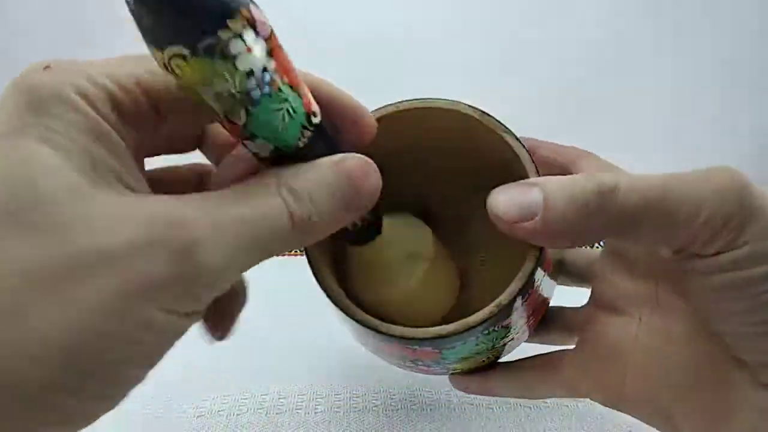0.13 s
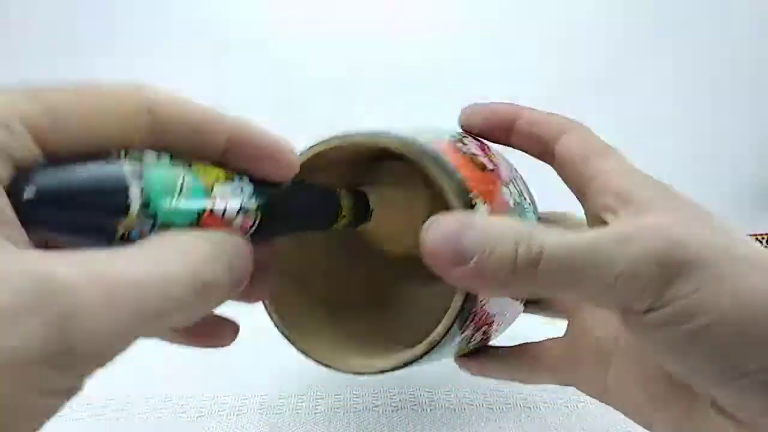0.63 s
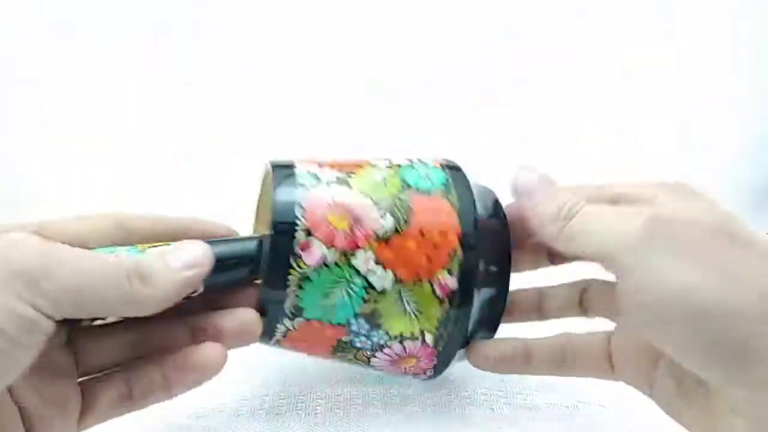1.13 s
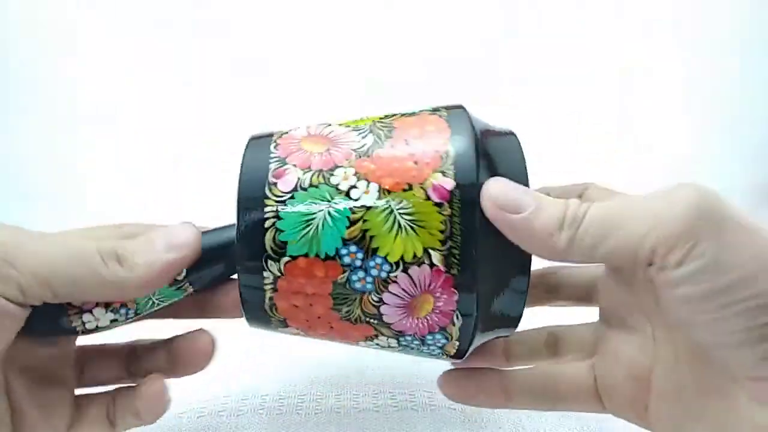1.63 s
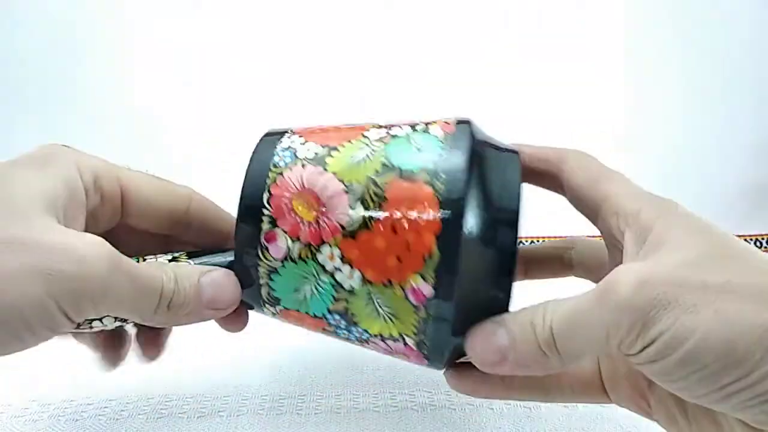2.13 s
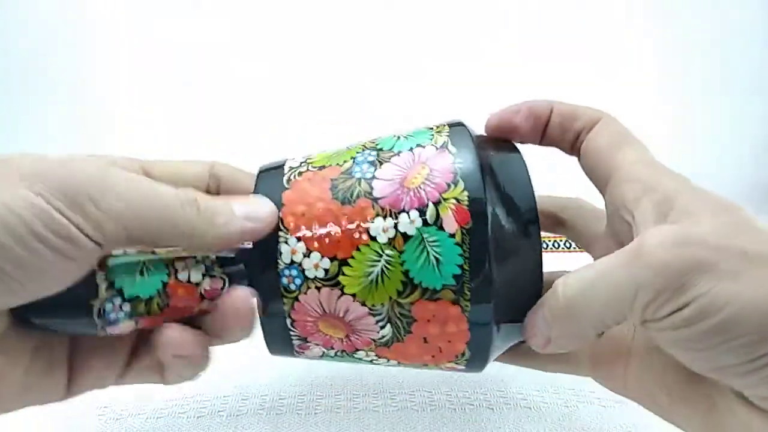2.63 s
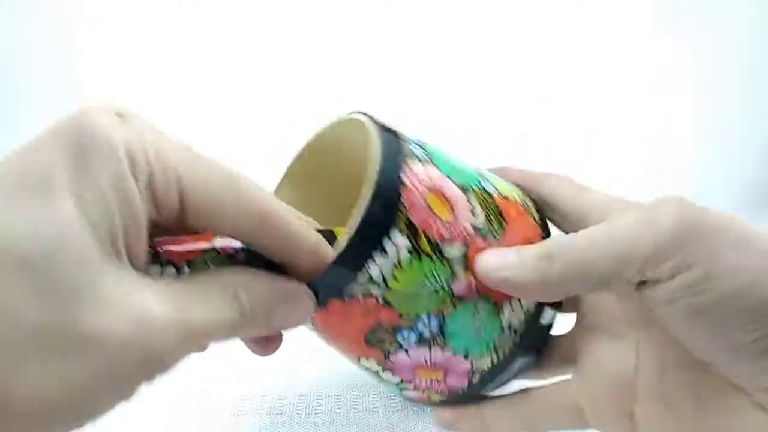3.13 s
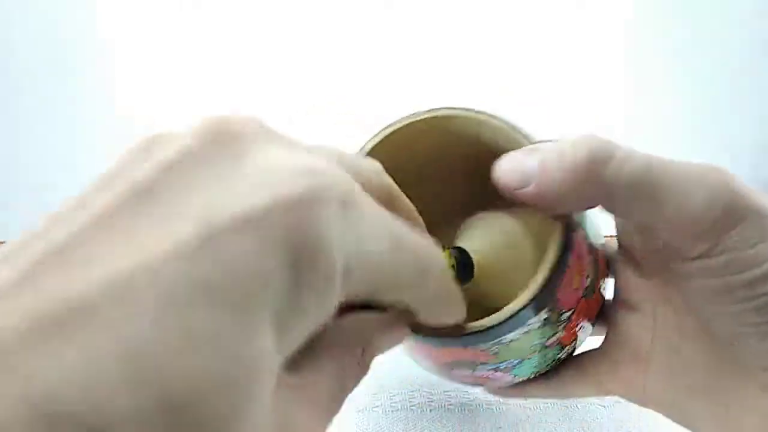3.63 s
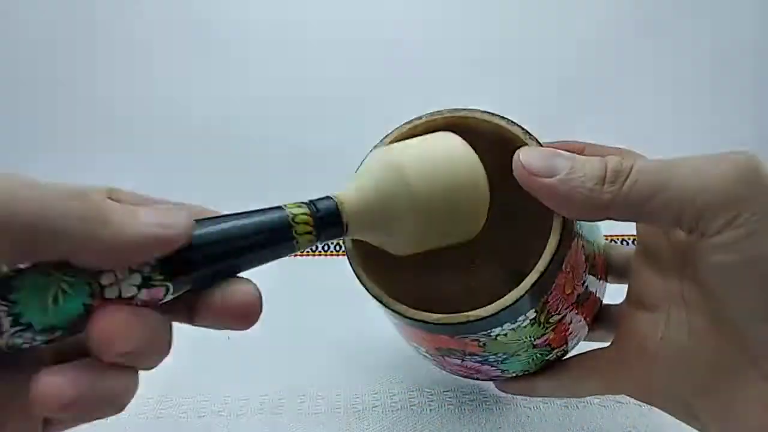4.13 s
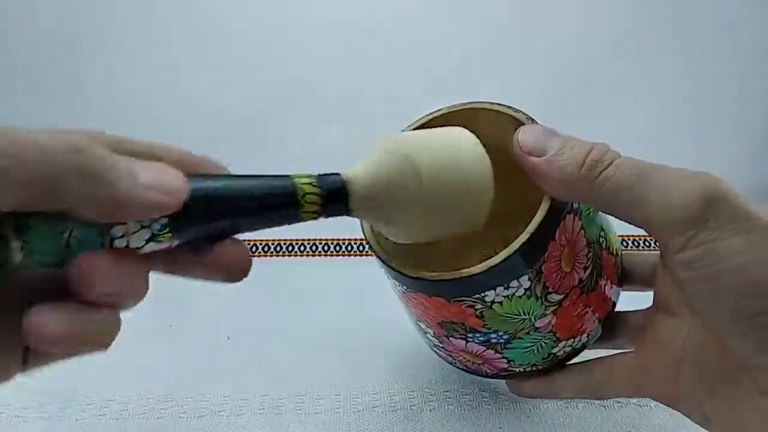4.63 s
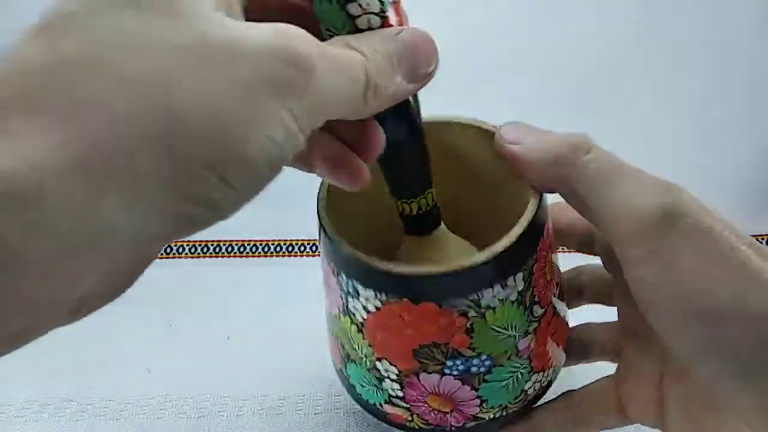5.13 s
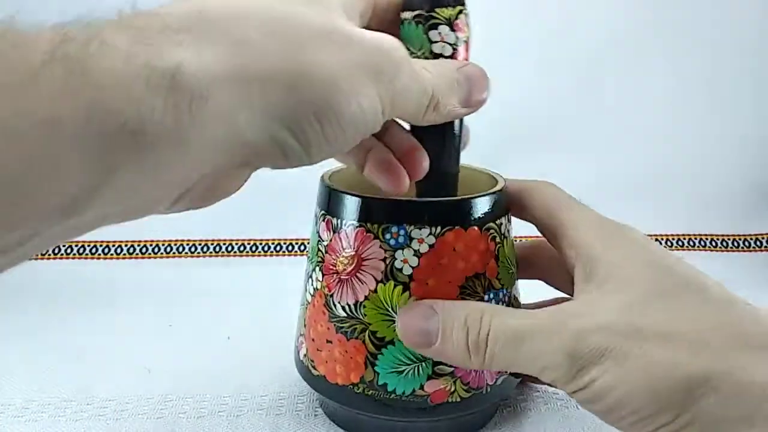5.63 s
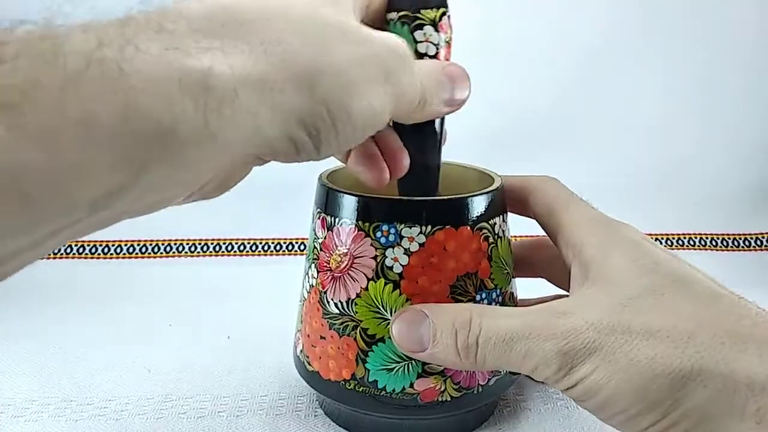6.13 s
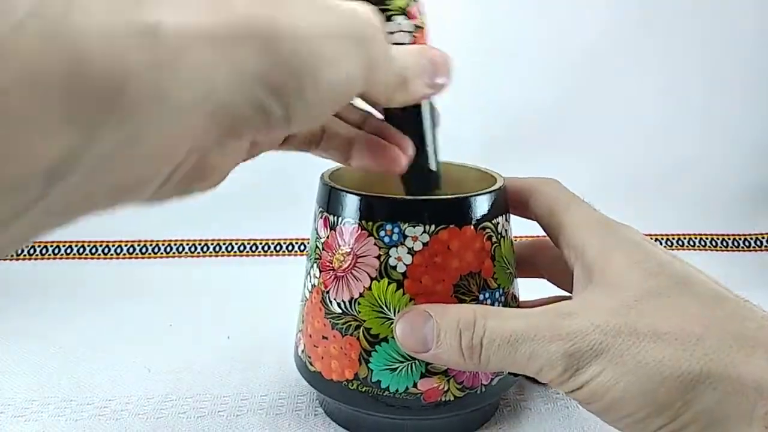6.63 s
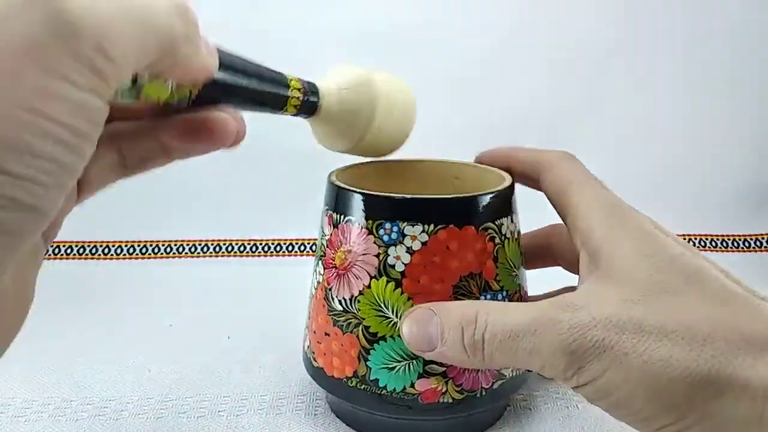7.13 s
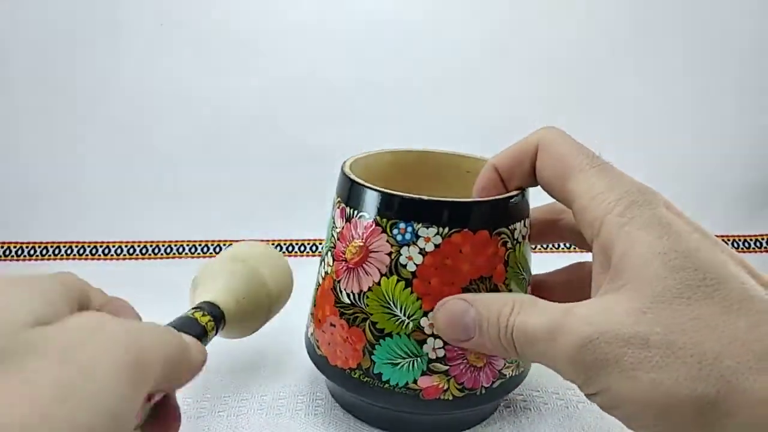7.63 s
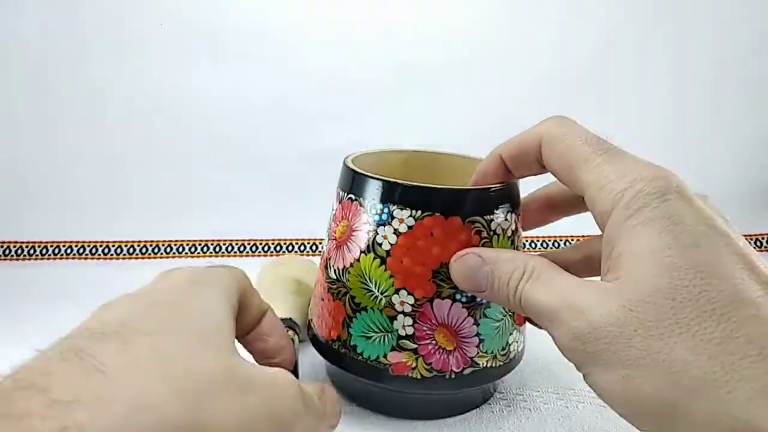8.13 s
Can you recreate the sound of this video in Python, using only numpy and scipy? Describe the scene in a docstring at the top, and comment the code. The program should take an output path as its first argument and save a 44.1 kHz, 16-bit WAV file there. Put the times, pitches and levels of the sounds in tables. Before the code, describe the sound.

A wooden pestle is handled inside a wooden mortar, very close to a stereo microphone in a quiet small room. Sharp hollow knocks come first, then a quieter stretch of faint skin and wood rubbing, a bright clack as the pestle comes out, dull thumps as the mortar lands on a cloth-covered table, a run of pounding and grinding, a last ringing knock and a soft set-down.

```python
"""Wooden mortar and pestle

A pestle knocks and rubs inside a hollow mortar turned in two hands, close to a stereo microphone.
Force pulses ring the cup air (boom), rim (ring) and wood (clack); stick-slip clicks make the rubbing hum.
Slow pushes thud on a cloth-covered table; thin squeaks are gliding sines; a quiet room adds hush and tail."""
import sys
import numpy as np
from scipy import signal
from scipy.io import wavfile
from scipy.ndimage import uniform_filter1d

SR = 44100
rng = np.random.default_rng(int(sys.argv[2]) if len(sys.argv) > 2 else 0)


def to_wav(s):
    """Save 16-bit WAV."""
    ch = np.atleast_2d(s).T  # columns
    pcm = np.round(np.clip(ch, -1, 1) * 32767)  # PCM
    wavfile.write(sys.argv[1], SR, pcm.astype(np.int16))


def volts_from_db(level):
    """Convert decibel levels to linear amplitude ratios."""
    exponent = np.asarray(level, float) / 20
    return 10 ** exponent


N = 364266

# upper modes of cup and pestle, ringing freely: f/Hz, level/dB, t60/s
WOOD_MODES = [(1039, 0.5, 0.019), (1340, 0, 0.031), (1860, -4.5, 0.084), (2040, -7.5, 0.052),
              (2360, -8, 0.033), (3091, -2, 0.06), (3430, -1.5, 0.064), (3353, -2.5, 0.057),
              (4314, 1.5, 0.054), (4850, -1.5, 0.09), (5450, -8.5, 0.096), (5928, -10.5, 0.12),
              (6787, -12.5, 0.12), (8430, -9.5, 0.03)]
# table-top modes, ringing freely: f/Hz, level/dB, t60/s
TABLE_MODES = [(75, -13.5, 0.37), (98.6, 0.5, 0.26), (145, 2, 0.19), (224, -0.5, 0.13), (430, -12, 0.057)]
POUNDING_S = (5.8, 6.8)  # from, to: pestle head plugs the cup floor and damps the air
RIM_HZ, RIM_T60_S = 867, .07  # ring time with the pestle inside
RIM_LEAD_RAD = -1.1  # the rim flexes: its two sides reach the ports out of step
CUP_LEAD_RAD = 0.76  # left leads
SPOT_LEAD_RAD = 1.1  # spread of a wood mode's phase between the ports
GRIP_SHARE = .34  # wood ring time left while the blow presses


def evened(x):
    """Scales to rms 1."""
    return x / np.sqrt(np.mean(x ** 2) + 1e-20)


def smoothed(x, size):
    """Two passes of a moving average over size samples."""
    return uniform_filter1d(uniform_filter1d(x, size=size), size=size)


def read(points, hz):
    """Reads a curve over frequency on a log-frequency axis."""
    f, value = np.transpose(points)
    return np.interp(np.log(hz + 1), np.log(f + 1), value)


def along(rows):
    """A curve over time, one value a sample."""
    s, value = np.transpose(rows)
    return np.interp(np.arange(N) / SR, s, value)


def add(mix, s, sound):
    """Mixes a two-channel sound in at time s."""
    part = mix[:, round(s * SR):][:, :sound.shape[1]]
    part += sound[:, :part.shape[1]]


def mode(hz, db, t60, lead_rad=0., length=8192):
    """A dying sine at both ports, the left one ahead by lead_rad."""
    t = np.arange(length) / SR
    phase = np.array([[lead_rad / 2], [-lead_rad / 2]])
    return volts_from_db(db - 60 * t / t60) * np.sin(2 * np.pi * hz * t + phase)


def ring(force, shape):
    """Convolves a force with a two-channel response."""
    return signal.oaconvolve(force[None], shape, axes=1)


def radiated(x, hz):
    """A small body sends out little sound below hz."""
    return signal.sosfilt(signal.butter(3, hz, "high", fs=SR, output="sos"), x)


def favoured(hz):
    """How far grinding on the cup floor favours a wood mode, 0-1, greatest at 3350 Hz."""
    return np.exp(-(np.log(hz / 3350) / .13) ** 2)


def noise(spectrum, likeness, patchy_db):
    """Coloured noise, left and right alike to a set degree, in short patches of level (patchy_db rms)."""
    frames, hz = N // 128 + 5, np.fft.rfftfreq(512, 1 / SR)
    a, b, c, d, patches = rng.standard_normal((frames, 257, 5)).T
    patches = uniform_filter1d(patches, size=4, axis=0)
    patches = evened(uniform_filter1d(patches, size=16, axis=1))
    same, left = np.clip(likeness(hz), -1, 1)[:, None], a + 1j * b
    right = same * left + np.sqrt(1 - same ** 2) * (c + 1j * d)
    z = np.array([left, right]) * volts_from_db(read(spectrum, hz)[:, None] + patchy_db * patches)
    return evened(signal.istft(z, nperseg=512, noverlap=384)[1][:, :N])


def strokes():
    """Each slide rises, holds and falls; gives the dB levels that drive hiss, wood, cup air and wall."""
    # slides of pestle and fingers over wood: start/s, length/s, hiss level/dB, then over the hiss:
    # cup air level/dB, wall level/dB
    slide_rows = [(0, 0.079, -60, -12, -12), (0.115, 0.0023, -41, -20.5, -34.5),
                  (0.134, 0.045, -57.5, -13.5, -29.5), (0.252, 0.0058, -51, -32, -24),
                  (0.284, 0.064, -58.5, -27.5, -23), (0.6, 0.036, -61, 3, -31.5),
                  (0.669, 0.0033, -48.5, 4, -32), (0.706, 0.044, -60, -28, -13),
                  (0.811, 0.026, -46.5, 8, -27.5), (0.85, 0.014, -54, -11.5, -22),
                  (0.893, 0.041, -44, -28.5, -11), (0.98, 0.032, -50.5, -2, 5),
                  (1.15, 0.0046, -49.5, 4, -12.5), (1.188, 0.058, -55.5, 0, -32.5),
                  (1.318, 0.027, -64, 5.5, -48.5), (1.417, 0.059, -60.5, -5, -15.5),
                  (1.622, 0.21, -61, -12, -22.5), (1.89, 0.15, -60, -6.5, -15),
                  (2.165, 0.14, -69, 2.5, -17), (2.306, 0.044, -64, -2.5, 9), (2.394, 0.087, -52, -7, 3.5),
                  (2.444, 0.0074, -45, -8, -5.5), (2.481, 0.068, -50.5, -10.5, 3),
                  (2.492, 0.0037, -53.5, -10, -11.5), (2.612, 0.076, -61.5, -9.5, -2),
                  (2.73, 0.023, -61.5, -5.5, -16), (2.844, 0.065, -65.5, -11, -25.5),
                  (2.913, 0.16, -60, -16.5, -23.5), (3.122, 0.048, -63.5, 2.5, -39),
                  (3.185, 0.042, -55, -13, -20), (3.251, 0.35, -64.5, -14, -20.5),
                  (3.678, .11, -50.5, -4.5, -18), (3.814, .11, -51, -12, -34), (3.953, 0.01, -62, 4, -11),
                  (4.146, 0.0016, -45.5, -35, -25), (4.221, 0.014, -45.5, -16.5, -10.5),
                  (4.357, 0.002, -53.5, -41, -40), (4.754, 0.0193, -76, -10, 4),
                  (4.824, 0.091, -63.5, -34, -23), (4.94, 0.063, -48.5, -17, -12),
                  (5.084, 0.45, -64.5, -13.5, -19), (5.265, 0.025, -48, -12.5, -3.5),
                  (5.301, 0.11, -47.5, -19.5, -11.5), (5.427, 0.16, -57, -14, -21.5),
                  (5.61, 0.029, -55, 0, -5.5), (5.71, .07, -76, 14, 4.5), (5.858, 0.006, -46, 1.5, -12.5),
                  (5.913, 0.055, -53, -5, -25), (6.031, 0.11, -51.5, -5.5, -8),
                  (6.201, 0.0072, -44.5, -2.5, -35), (6.245, 0.0045, -46.5, -0.5, -40),
                  (6.326, 0.0051, -40.5, 4, -36.5), (6.396, 0.062, -47.5, -6.5, -4.5),
                  (6.546, 0.01, -40, -3.5, -29), (6.635, 0.022, -50, 1.5, -20),
                  (6.71, 0.023, -38.5, -9, -2.5), (6.872, 0.075, -51, -17.5, -12.5),
                  (7.104, 0.068, -61.5, -17.5, -15), (7.175, 0.011, -42, -5.5, -38),
                  (7.346, 0.051, -61, -7, -23), (7.554, 0.019, -54, -25, -14.5),
                  (7.665, 0.046, -61, -14, -8.5), (7.778, 0.05, -53.5, -18.5, -18),
                  (7.927, 0.0081, -65, 0, -5.5), (8.155, 0.09, -58.5, -5, -7)]
    # fingers resting on the lacquer, level/dB: hiss, wood, cup air, wall
    rest_levels_db = [-78, -96, -96.5, -95.5]
    rise_db_per_s, fall_db_per_s = 646.5, 602.5
    start, length, hiss_db, cup_db, wall_db = np.transpose(slide_rows)[:, :, None]
    t = np.arange(0, N / SR + .002, .002)
    rise_db = rise_db_per_s * np.maximum(start - t, 0)
    fall_db = fall_db_per_s * np.maximum(t - start - length, 0)
    shape_db = hiss_db - rise_db - fall_db
    # the harder the pestle bears on cup and wall, the more the wood joins in
    wood_db = 1 + 0.42 * cup_db + 0.16 * wall_db
    levels = []
    for part_db, rest_db in zip([0, wood_db, cup_db, wall_db], rest_levels_db):
        power = (volts_from_db(shape_db + part_db) ** 2).sum(0) + volts_from_db(rest_db) ** 2
        levels.append(np.interp(np.arange(N) / SR, t, 10 * np.log10(power)))
    return levels


def slips(per_s, spread_db):
    """Stick-slip clicks of random sign; a few are large."""
    size = volts_from_db(spread_db * np.minimum(rng.exponential(1, N), 4))
    return size * rng.choice([-1., 1.], N) * (rng.random(N) < per_s / SR)


def excited(stroke_db, shape, per_s, spread_db, contact_s):
    """Slips as strong as the stroke ring a response, which dies on its own; long contacts sound dull."""
    soft = ring(np.hanning(round(contact_s * SR) + 3), shape)
    clicks = volts_from_db(stroke_db) * evened(slips(per_s, spread_db))
    return ring(clicks, soft / np.linalg.norm(soft[0]))[:, :N]


def grinding(stroke_db):
    """Slips ring the wood modes; as the contact point wanders, each comes, goes and drifts in pitch."""
    ring_share, drift_share = .33, .025  # ring time left under a sliding contact; rms pitch drift
    floor_bite_db = 6  # for a fully favoured mode
    clicks, out = volts_from_db(stroke_db) * evened(slips(2700, 2.7)), np.zeros((2, N))
    on_floor = abs(np.arange(N) / SR - np.mean(POUNDING_S)) < np.ptp(POUNDING_S) / 2
    for hz, db, t60 in WOOD_MODES:
        swell, drift = evened(smoothed(rng.standard_normal((2, N)), 2000))
        turn = np.exp(2j * np.pi * np.cumsum(hz * (1 + drift_share * drift)) / SR)
        fade = volts_from_db(-60 / (SR * ring_share * t60))
        driven = clicks * volts_from_db(3.054 * swell + floor_bite_db * favoured(hz) * on_floor)
        rung = turn * signal.lfilter([1], [1, -fade], driven / turn)  # one-pole resonator at moving pitch
        ports = np.exp(1j * SPOT_LEAD_RAD * rng.standard_normal((2, 1)))
        out += volts_from_db(6.37 * np.log2(hz / 1000) + db) * (rung * ports).imag
    return volts_from_db(-37.0) * out


def wavering(x, share):
    """Bends the pitch up and down by share rms, as a shifting grip bends a resonance."""
    shift = smoothed(rng.standard_normal(N), 1200)
    at = np.arange(N) + share * shift / np.std(np.diff(shift))
    return np.array([np.interp(at, np.arange(N), v) for v in x])


def rubbing():
    """Sliding hisses, and its slips set wood modes, cup air, wall and table humming."""
    # skin hiss spectrum: f/Hz, level per Hz/dB
    skin_spectrum = [(710, -43), (1200, -35), (1620, -27.5), (1800, -12), (2570, -12), (3510, -6.5),
                     (7210, -3), (8380, 1.5), (15600, -19)]
    # air in the cup: f/Hz, level/dB, t60/s
    hollow_modes = [(675.4, 10, 0.04), (480, 4, 0.0012), (670, -11.5, 0.031)]
    # broad wall modes beside the rim tone: f/Hz, level/dB, t60/s
    wall_modes = [(943, 6.5, 0.045), (246, 18, 0.0048)]
    # how firmly the mortar bears on the table: t/s, rumble over the hiss/dB
    bearing_curve = [(0, -11.5), (.5, 11), (.9, -23), (1.05, 26.5), (1.3, -29.5), (1.8, -25), (2.4, -9),
                     (2.9, -44), (3.4, -2), (4, -15), (4.8, -5), (5.2, -26), (5.5, 5), (5.65, -10), (6, 8),
                     (6.25, 2.5), (6.6, 11), (6.8, -14), (7.3, -5), (7.8, -40), (8.25, -4)]
    # how much bare wood rather than skin rubs: t/s, rasp level/dB
    bare_curve = [(0, 4), (.8, 1.5), (1.1, 4), (1.7, 1), (2.45, 3.5), (2.9, 2.5), (3.7, 1.5), (4.2, 6),
                  (4.6, 7.5), (4.95, 2.5), (5.3, 3), (5.8, 3.5), (6.4, 4.5), (6.65, 5.5), (6.75, -1.5),
                  (7.2, 4.5), (8.25, -1)]
    hiss_yield = 0.55  # share of the rasp's rise that the hiss gives up
    hiss_db, wood_db, cup_db, wall_db = strokes()
    catch_db = 3 * evened(smoothed(rng.standard_normal(N), 200))  # uneven grip
    stroke_db, bare_db = hiss_db + catch_db, along(bare_curve)
    hiss = noise(skin_spectrum, lambda hz: 0.12 + 0 * hz, patchy_db=5.0)
    hiss *= volts_from_db(stroke_db + 1.5 - hiss_yield * bare_db)
    hollow = sum(mode(*row, CUP_LEAD_RAD) for row in hollow_modes)
    wall = mode(RIM_HZ, 0, RIM_T60_S, RIM_LEAD_RAD) + sum(mode(*row) for row in wall_modes)
    top = sum(mode(hz, db + 4 * np.log2(hz / 100), 0.5 * t60) for hz, db, t60 in TABLE_MODES)
    wood = grinding(catch_db + wood_db + bare_db)
    cup = excited(catch_db + cup_db, hollow, 400, 4.0, contact_s=0.0016)
    side = excited(catch_db + wall_db, wall, 600, 4.0, contact_s=0.001)
    table = excited(stroke_db + along(bearing_curve), top, 180, 4.0, contact_s=0.00073)
    body = wood + wavering(cup, 0.033) + wavering(side, .04)
    return hiss + radiated(body, 243) + table


def hush():
    """Steady coloured noise of the quiet room, partly alike left and right."""
    # room noise spectrum: f/Hz, level per Hz/dB
    floor_spectrum = [(15, -68.5), (25, -54.5), (86, -10.5), (126, -36.5), (160, -28), (204, -16.5),
                      (253, -21), (1460, -31), (1810, -31), (6420, -32.5), (15600, -32)]
    # left-right likeness: f/Hz, likeness/1
    same_curve = [(60, 0.63), (380, 0.006), (2380, 0.1), (15000, 0.028)]
    return volts_from_db(-67) * noise(floor_spectrum, lambda hz: read(same_curve, hz), patchy_db=-1.5)


def boom(cup_hz, rim_db, free, plugged):
    """Cup air and rim response; deeper air dies sooner, and a lifted pestle leaves both ringing longer."""
    cup_t60_at_650_hz = .056 if free else .02 if plugged else .031
    cup = mode(cup_hz, 0, cup_t60_at_650_hz * (cup_hz / 650) ** 2.5, CUP_LEAD_RAD)
    cup += mode(0.47 * cup_hz, 0.67, 0.00051)
    return cup + mode(RIM_HZ, rim_db + 0.5, .24 if free else RIM_T60_S, RIM_LEAD_RAD)


def clack(lower_db, upper_db, spot):
    """Wood modes and their twins across the grain, shifted by grip and struck spot, build up as it lands."""
    detune_share, spot_db, twin_share, rise_s = .015, 3.5, .07, .0004
    twins = [(hz * (1 + twin_share * u), db - 3, t60)
             for (hz, db, t60), u in zip(WOOD_MODES, spot[::-1, 0])]
    out = 0
    for (hz, db, t60), (u, v, w) in zip(WOOD_MODES + twins, spot):
        level_db = db + spot_db * v + (lower_db if hz < 2600 else upper_db)
        out = out + mode(hz * (1 + detune_share * u), level_db, GRIP_SHARE * t60, SPOT_LEAD_RAD * w)
    return out * (1 - np.exp(-np.arange(out.shape[1]) / SR / rise_s))


def chattered(blow, tremble, free):
    """The pestle trembles softly against the wood after each blow: the blow repeats in faint touches."""
    chatter_db, chatter_t60_s, contact_s = -32 if free else -14.5, .08, .0007
    touches = tremble * volts_from_db(chatter_db - 60 * np.arange(len(tremble)) / SR / chatter_t60_s)
    soft = np.hanning(round(contact_s * SR))
    touches = np.convolve(touches, soft / soft.sum())
    touches[0] = 1  # the blow itself
    return ring(touches, blow)


def knock(cup_hz, rim_db, upper_db, free, plugged, spot, tremble, crack):
    """A short force pulse, shorter the harder the blow, rings cup air, rim and wood, with a broad crack."""
    # lower wood modes follow brightness in part, ring more near the rim and on the thick floor
    lower_db = 5.5 + 0.71 * upper_db + 0.18 * rim_db + 4 * plugged
    pulse_s = np.clip(.00088239 * volts_from_db(-.25 * (lower_db + 9.5)), .0002634, .003951)
    force = np.blackman(round(pulse_s * SR) + 3)
    low = ring(force / force.sum(), boom(cup_hz, rim_db, free, plugged))
    sharp = ring(np.hanning(9) / 4, clack(lower_db, upper_db, spot))
    crack_db, crack_t60_s = upper_db - 8 + 3.2 * (1 + 0) * free, 0.013
    sharp[:, :512] += crack * volts_from_db(crack_db - 60 * np.arange(512) / SR / crack_t60_s)
    sharp = np.roll(sharp, len(force) // 2, axis=1)  # strongest in the middle of the contact
    blow = -volts_from_db(4.5) * sharp - low[:, :sharp.shape[1]] / abs(low).max()
    sound = radiated(chattered(blow, tremble, free), 0.32 * cup_hz * (1.3 if free else 1))
    return sound / abs(sound).max()


def knocks():
    """Knocks of wood on wood, each with its own struck spot, tremble and crack."""
    # blows: t/s, peak level/dB, cup air f/Hz, rim ring level/dB, brightness/dB
    knock_rows = [(0.007, -36, 346, -43, -50), (0.079, -39.5, 384, -41.5, -36.5),
                  (0.115, -13, 333, -43.5, -11), (0.118, -21, 672, -28, -12.5), (0.123, -26, 385, -41, -6),
                  (0.125, -24.5, 606, -27.5, 2), (0.17, -37.5, 630, -2, -12.5),
                  (0.254, -4, 660, -17.5, -24.5), (0.301, -12, 675, -8, -30), (0.325, -15, 660, -18, -33),
                  (0.541, -26.5, 420, -29.5, -27.5), (0.667, -8.5, 636, -20, -24.5),
                  (0.726, -10.5, 655, -79, -35.5), (0.804, -37, 600, -41, -38),
                  (0.819, -24.5, 665, -28, -45), (0.834, -23, 634, -33, -64), (0.849, -24, 596, -51, -47),
                  (0.954, -34, 680, 3, -37.5), (1.017, -28.5, 353, -14, -27.5),
                  (1.148, -9.5, 538, 2.5, -36), (1.185, -34.5, 823, -34, -25),
                  (1.346, -25, 480, -8.5, -50.5), (1.403, -43.5, 765, -45, -18),
                  (2.008, -39.5, 746, -46, -11), (2.161, -36, 331, -42, -81),
                  (2.201, -34.5, 321, -3.5, -67), (2.381, -16, 680, 1, -53),
                  (3.848, -29.5, 644, -11, -59.5), (3.907, -34.5, 590, -25, 21),
                  (4.137, -9.5, 619, -52, -13.5), (4.139, -12, 596, -22, -3),
                  (4.357, -46.5, 503, -40.5, -5), (4.928, -32.5, 394, -64, -48),
                  (4.94, -38, 404, -63, -39.5), (4.952, -29.5, 440, -74, -36.5),
                  (4.960, -30, 430, -60, -36.5), (5.273, -24, 672, -49, -45), (5.414, -13, 465, 1.5, -59.5),
                  (5.422, -19, 695, -60, -26.5), (5.85, -40.5, 594, -24, -7.5),
                  (5.958, -39.5, 710, -29.5, -39.5), (5.995, -44, 500, -32, -28),
                  (6.073, -7.5, 628, -10.5, -30), (6.311, -32, 490, -66, -29), (6.335, -4, 621, -55, -16.5),
                  (6.342, -4.5, 543, -5, -38.5), (6.367, -21, 568, -26, -38.5),
                  (6.542, -23, 750, -13, -49.5), (6.673, -6, 643, -15, -32), (6.954, -39.5, 678, -7, -22.5),
                  (7.169, -6.5, 643, 2, -42), (7.188, -14, 580, 4.5, -47), (8.134, -33.5, 339, -34, -33.5)]
    # pestle lifted out: from/s, to/s
    out_spans = [(4.0, 4.8), (7.0, 8.3)]
    out, count = np.zeros((2, N)), len(knock_rows)
    spots = rng.standard_normal((count, 2 * len(WOOD_MODES), 3))
    trembles = rng.standard_normal((count, 4096)) * (rng.random((count, 4096)) < 700 / SR)
    cracks = uniform_filter1d(rng.standard_normal((count, 2, 512)), size=5, axis=2)
    for (s, db, *colour), spot, tremble, crack in zip(knock_rows, spots, trembles, cracks):
        free = any(a < s < b for a, b in out_spans)
        plugged = POUNDING_S[0] < s < POUNDING_S[1]
        add(out, s, volts_from_db(db) * knock(*colour, free, plugged, spot, tremble, crack))
    return out


def catches():
    """The pestle catches on the grain: a short noise burst rings the modes that grinding favours."""
    # catches: t/s, peak level/dB
    catch_rows = [(0.822, -33), (0.848, -38), (5.96, -44), (6.056, -32), (6.256, -32), (6.308, -36),
                  (6.652, -30)]
    out, size = np.zeros((2, N)), round(.01 * SR)
    body = sum(favoured(hz) * mode(hz, db, GRIP_SHARE * t60, length=2048) for hz, db, t60 in WOOD_MODES)
    for (s, db), burst in zip(catch_rows, rng.standard_normal((len(catch_rows), size))):
        sound = ring(burst * np.hanning(size), body)
        add(out, s, volts_from_db(db) * sound / abs(sound).max())
    return out


def thuds():
    """Cloth softens the blow into a push of about two slow cycles, which leaves the table top ringing."""
    # thuds into the table: t/s, peak level/dB, push f/Hz
    thud_rows = [(0.987, -21.5, 110), (1.016, -32.5, 149), (1.418, -48, 232), (3.375, -47.5, 94.6),
                 (5.243, -21, 95), (5.401, -15, 98), (5.495, -39, 88), (5.853, -32.5, 135),
                 (5.917, -42.5, 154), (6.06, -22, 133), (6.194, -25.5, 140), (6.209, -25.5, 144),
                 (6.258, -27, 230), (6.309, -29, 145), (6.33, -17, 241), (6.438, -35.5, 138),
                 (6.53, -22, 119), (6.645, -27, 114), (7.187, -30, 105), (8.112, -26.5, 106),
                 (8.165, -17.5, 136), (8.196, -35, 158)]
    out, top = np.zeros((2, N)), sum(mode(*row, length=16384) for row in TABLE_MODES)
    for s, db, hz in thud_rows:
        turns = np.arange(0, 2.4, hz / SR)
        push = np.sin(2 * np.pi * turns) * np.hanning(len(turns))
        ringing = ring(push, top)
        sound = volts_from_db(-8.5) * ringing / abs(ringing).max()
        sound[:, :len(push)] += push
        add(out, s, volts_from_db(db) * sound / abs(sound).max())
    return out


def squeaks():
    """Thin wavering tones, perhaps skin on lacquer, sag in pitch under a fuzzy upper tone that stays put."""
    # squeaks: start/s, length/s, level/dB, start f/Hz
    squeak_rows = [(7.542, .06, -65, 1720), (7.56, .085, -59, 1570), (7.628, .065, -64, 1830),
                   (7.69, .04, -69, 1400)]
    sag_hz_per_s, waver_share, rough_share = 2400, .012, .4
    out = np.zeros((2, N))
    for s, length, db, hz in squeak_rows:
        t = np.arange(0, length, 1 / SR)
        waver = waver_share * evened(uniform_filter1d(rng.standard_normal(8192), size=500))[:len(t)]
        flutter, fuzz = evened(uniform_filter1d(rng.standard_normal((2, 8192)), size=250))[:, :len(t)]
        angle = 2 * np.pi * np.cumsum((hz - sag_hz_per_s * t) * (1 + waver)) / SR
        upper_angle = 2 * np.pi * np.cumsum(2680 * (1 + waver)) / SR
        tone = (1 + rough_share * flutter) * np.sin(angle) + volts_from_db(-2.0) * fuzz * np.sin(upper_angle)
        add(out, s, volts_from_db(db) * np.sin(np.pi * t / length) * tone * np.ones((2, 1)))
    return out


def room(x):
    """Sparse taps of random sign, one in every 20 samples, each band dying at its own speed."""
    # reverberation: f/Hz, t60/s
    room_t60 = [(100, 0.092), (700, 0.24), (3000, 0.26), (10000, 0.25)]
    taps = np.zeros((2, SR // 2))
    starts = np.arange(300, SR // 2 - 20, 20)
    at = starts + rng.integers(0, 20, (2, len(starts)))
    np.put_along_axis(taps, at, rng.choice([-1., 1.], at.shape), 1)
    hz, t, z = signal.stft(taps, SR, nperseg=256)
    decay = volts_from_db(-60 * t / read(room_t60, hz)[:, None])
    tail = signal.istft(z * decay, SR, nperseg=256)[1]
    return ring(x.mean(0), tail / np.linalg.norm(tail[0]))[:, :N]


def scene():
    """Near sounds with a little room, over the hush of the room."""
    near = rubbing() + knocks() + catches() + thuds() + squeaks()
    # the hands work a little off the axis of the ports: left lags 3 samples
    near = np.array([volts_from_db(-0.15) * np.roll(near[0], 3), near[1]])
    return near + volts_from_db(-15.0) * room(near) + hush()


def band_limit(x):
    """A steep low-pass at the top of the band."""
    return signal.sosfilt(signal.butter(12, 15760, fs=SR, output="sos"), x)


def record(dry):
    """The microphone loses the deep bass, below 57 Hz."""
    mix = signal.sosfilt(signal.butter(2, 57, "high", fs=SR, output="sos"), dry)
    return band_limit(mix)


dry = scene()
out = record(dry)
to_wav(out)
```